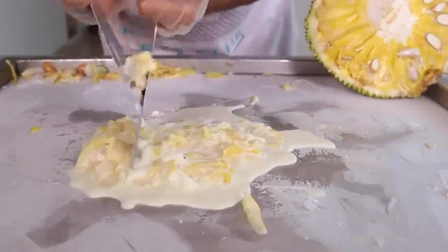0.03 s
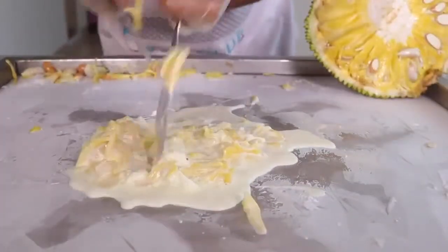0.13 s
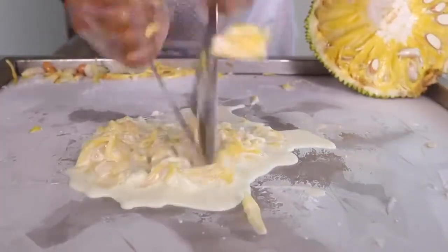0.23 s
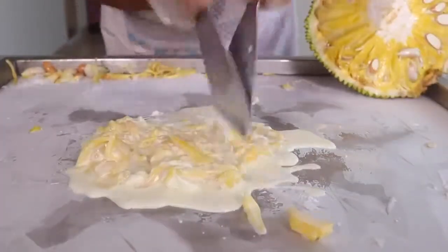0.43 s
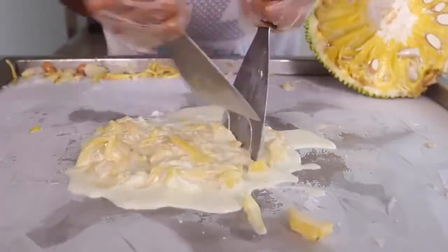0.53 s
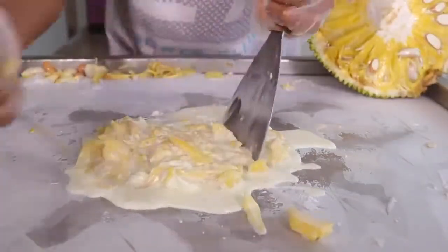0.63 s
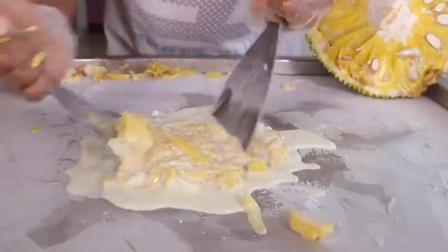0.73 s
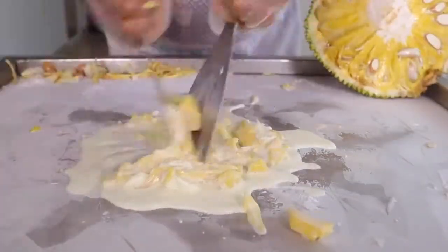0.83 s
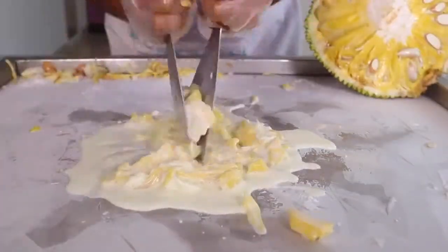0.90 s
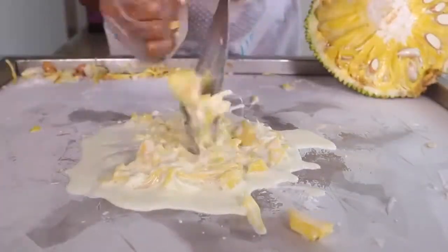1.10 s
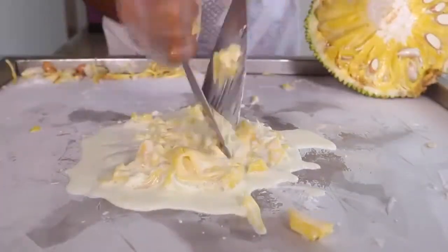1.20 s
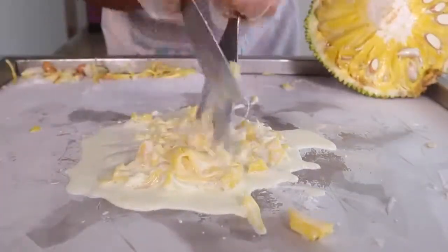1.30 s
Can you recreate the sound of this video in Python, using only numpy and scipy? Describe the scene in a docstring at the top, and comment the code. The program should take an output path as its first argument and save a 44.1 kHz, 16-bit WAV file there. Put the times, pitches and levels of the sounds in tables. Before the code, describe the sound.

Two steel scrapers chop fruit and cream on a metal plate, opening with quick taps, soft thuds and a light sliding hiss. Around 0.5 seconds the blades clink together three times, and at 0.6 two hard chops set the plate ringing. A tap follows at 0.8, then a few more taps and a dull thud between 1.1 and 1.35. A cooling machine hums faintly throughout.

```python
"""Two steel scrapers chop fruit and cream on the steel cold plate of a food stall. From the start a
cooling machine hums and the sliding blades hiss; edges tap the plate, and strokes cushioned by pulp
only thud. Around half a second in, the blades clink together three times, then two hard chops set
the whole plate ringing. As the ring dies away, a few more taps and one last thud follow."""
import sys
import numpy as np
from scipy import signal
from scipy.fft import rfft, irfft, next_fast_len
from scipy.io import wavfile
from scipy.ndimage import map_coordinates

SR = 44100
rng = np.random.default_rng(int(sys.argv[2]) if len(sys.argv) > 2 else 0)


def persist_wave(psi):
    """Save psi, clipped to +-1, as 16-bit WAV."""
    counts = np.round(np.clip(psi, -1, 1) * 32767).astype(np.int16)
    wavfile.write(sys.argv[1], SR, np.atleast_2d(counts).T)


N = 59535

# hum lines of the cooling machine (frequency [Hz], level [dB])
HUM_LINES = [(231.5, -62.5), (285.3, -57.5), (360.7, -57), (479.1, -62.5), (662.1, -70), (812.9, -64)]
# bed of fan and stall noise (frequency [Hz], level [dB])
FAN_COLOUR = [(15, -71), (25, -28), (97, -13), (145, -14.5), (175, -3.5), (256, -5.5), (293, 0.5),
              (384, -16), (416, -5.5), (818, -10.5), (1160, -14.5), (1740, -16.5), (16000, -46)]
# its stereo image (frequency [Hz], left-right likeness [0-1])
FAN_ALIKE = [(60, 0.94), (300, 0.99), (700, 0.82), (2000, 0.28), (10000, 0.13)]

# swells of the blades sliding through cream (time [s], level [dB])
SLIDE_LEVELS = [(0, -45.5), (.06, -51.5), (.125, -48.5), (.18, -53.5), (.25, -47.5), (.31, -53),
                (.37, -54.5), (.44, -46.5), (.55, -43.5), (.62, -45.5), (.8, -53), (1.06, -62.5),
                (1.22, -54), (1.35, -56.5)]
# their hiss (frequency [Hz], level [dB])
SLIDE_COLOUR = [(300, -13), (1500, -4), (2600, 3.5), (5500, 0), (7300, -5.5), (10000, 0.5), (13500, -4),
                (16000, -6)]

# light edge taps (time [s], level [dB], treble tilt [dB/octave], pan left [dB], blade clang [dB])
TAPS = [(.002, -35, 2.5, -1.5, -63.5), (.076, -36, 0.5, -1, -60), (0.0919, -42.5, 0, 0, -60),
        (0.131, -40.5, 5, -1, -59), (.144, -38.5, 0.5, 1, -55), (0.2076, -27.5, 3.5, 0, -46),
        (0.237, -39.5, 0.5, 8, -52), (0.244, -40.5, 0, -10, -44), (0.3242, -36.5, 1.5, -1.5, -27.5),
        (.4085, -27.5, 0.5, -2.5, -26.5), (0.5296, -30, 2, -1, -48), (0.8111, -30, 1, 0.5, -38),
        (1.1495, -50.5, 0, -2.5, -43.5), (1.19, -51, 2, -4, -46), (1.224, -41.5, -5, -3.5, -39),
        (1.2754, -46.5, -8, -3, -59), (1.302, -46, -1, -1, -59), (1.341, -33.5, 5.5, -1, -37.5)]
# bright tick of a tap (frequency [Hz], level [dB])
TAP_COLOUR = [(200, -14), (1100, -10.5), (2300, -1), (4500, -2), (6000, 2), (7300, -3.5), (10000, -0.5),
              (11500, -4.5), (13300, 2), (16000, -9.5)]
# clang of a damped blade (frequency [Hz], level [dB])
CLANG_COLOUR = [(1500, -40), (3000, -23), (3500, 0.5), (4400, 0.5), (5000, -1), (5600, -9.5), (7500, -14),
                (9600, -25), (10100, 0), (10700, -16), (16000, -12)]

# strokes cushioned by pulp (time [s], thud [dB], knock [dB], low plate ring [dB])
THUDS = [(.003, -49, -47, -44.5), (0.124, -44.5, -51, -67), (.236, -38.5, -56, -64),
         (0.343, -38.5, -43.5, -49), (.469, -44, -52, -69), (0.52, -41, -59, -63),
         (1.239, -39.5, -40.5, -39)]
# soft boom of a thud (frequency [Hz], level [dB])
THUD_COLOUR = [(25, -33), (60, -11), (110, -13), (175, 5.5), (230, 0.5), (300, -3.5), (400, -5.5),
               (490, -2), (620, -15), (850, -32), (1300, -22), (5000, -49)]
# hollow knock of the sheet (frequency [Hz], level [dB])
KNOCK_COLOUR = [(60, -32), (130, -13), (220, 0.5), (350, -9), (490, -12), (600, 0), (780, 2.5), (900, 2.5),
                (1100, -8), (1500, 2.5), (2200, -29), (3400, -9.5), (4600, -3), (5600, -35)]
# stereo image of knocks and thuds (frequency [Hz], left-right likeness [0-1])
KNOCK_ALIKE = [(200, 0.99), (800, 0.88), (2000, 0.38)]
# the plate's clearest modes (frequency [Hz], level [dB], t60 [s])
PLATE_MODES = [(182.1, -15, .6), (483, -0.5, .38), (735, -8, .22), (768, -13.5, .4), (808, -14, 0.59),
               (862, -11, 0.31), (900.6, -8, 0.22), (1466, -11, 0.308), (1832, -6, .26), (2013, -10, 0.48),
               (1950, -1.5, 0.28), (2149, 2, 0.275), (2484, -8.5, 0.38), (3430, -11, .28), (4134, -6, 0.2)]

# blade meets blade (time [s], ring [dB], rasp [dB], lead-in rub [s])
CLINKS = [(.459, -26, -23.5, 0.0045), (0.5123, -33, -26.5, 0.0028), (0.588, -35, -24.5, 0.00098)]
# modes of a freely ringing blade (frequency [Hz], level [dB], t60 [s])
BLADE_MODES = [(3047, -12.5, .22), (5896, 0, 0.1), (5850, -7, 0.023), (9200, -13, .04), (12500, -10, 0.039),
               (13400, 3.5, 0.041), (13370, 1, 0.098), (15300, -4, 0.086)]
# rasp of steel on steel (frequency [Hz], level [dB])
RASP_COLOUR = [(500, -31), (2000, -10.5), (3500, -0.5), (5800, -9), (7000, -9), (9000, -1), (11000, 1),
               (13300, 8.5), (16000, -5)]

# hard chops (time [s], crack [dB], treble tilt [dB/octave], bite [dB], blade clang [dB],
# knock [dB], wash [dB], low plate ring [dB], high plate ring [dB])
CHOPS = [(0.6031, -16.5, 1.5, -17.5, -25.5, -32.5, -29, -37, -30.5),
         (0.6336, -23, 2, -19, -25, -21, -32.5, -32, -39.5)]
# crack of a chop (frequency [Hz], level [dB])
CRACK_COLOUR = [(150, -21), (500, -16), (820, -4), (1200, -17), (1750, 2), (2150, 4.5), (2900, -14.5),
                (3900, -4.5), (5200, -15.5), (8000, -17.5), (16000, -31)]
# its stereo image (frequency [Hz], left-right likeness [0-1])
CRACK_ALIKE = [(200, .97), (850, 0.94), (1500, .65), (2200, .1), (4000, 0.17)]
# the edge biting the steel (frequency [Hz], level [dB])
BITE_COLOUR = [(500, -11), (2000, -3), (4500, 0), (7500, -1), (13500, 0), (16000, -4)]
# wash of the plate's dense modes (frequency [Hz], level [dB])
WASH_COLOUR = [(60, -14.5), (200, -3.5), (350, -0.5), (850, -3.5), (1200, -10), (2000, 2), (2900, -5.5),
               (4000, -3.5), (5200, -11), (8000, -9), (16000, -12)]
# its decay (frequency [Hz], t60 [s])
WASH_T60 = [(200, 0.7), (900, 1), (2000, 0.85), (4500, 0.63), (14000, 0.28)]
# its stereo image (frequency [Hz], left-right likeness [0-1])
WASH_ALIKE = [(200, .97), (500, .88), (1000, 0.63), (2000, 0.12), (10000, 0.089)]

EDGE_ALIKE = 0.47  # left-right likeness of ticks, clangs, rasps and bites
GRIND_S, GRIND_DB = 0.0034, -13.5  # the edge cuts through fruit just before a chop lands
TAP_SEND_DB, CLINK_SEND_DB, ROOM_T60 = -7.5, -16, 0.49
LOW_MODES_HZ, TOP_HZ = 900, 15900


def amp(db):
    """Decibels to gain."""
    return 10 ** (np.asarray(db) / 20)


def unit(x):
    """Scale to rms 1."""
    return x / np.sqrt(np.mean(x ** 2) + 1e-20)


def along(points, hz):
    """Read (frequency [Hz], value) points on a log axis."""
    freqs, values = np.transpose(points)
    return np.interp(np.log(hz + 1), np.log(freqs + 1), values)


def since(s):
    """Seconds since time s, negative before it."""
    return np.arange(N) / SR - s


def wobble(rate):
    """A smooth random curve, rate knots a second."""
    return map_coordinates(rng.standard_normal(2048), [since(0) * rate + 2], mode="mirror")


def noise(colour, alike, tilt_db=0):
    """Coloured stereo noise of rms 1; alike is a likeness or a table, tilt is per octave above 1 kHz."""
    size = 2 * next_fast_len(N // 2 + 1)
    hz = np.fft.rfftfreq(size, 1 / SR)
    likeness = along(alike, hz) if np.ndim(alike) else alike
    width = np.arccos(np.clip(likeness, -1, 1)) / 2
    octaves = np.log2(np.maximum(hz, 1000) / 1000)
    gain = amp(along(colour, hz) + tilt_db * octaves) * (hz < TOP_HZ)
    spectra = rfft(rng.standard_normal((2, size))) * gain
    mid, side = spectra[0] * np.cos(width), spectra[1] * np.sin(width)
    return unit(irfft(np.array([mid + side, mid - side]))[:, :N])


def fade(s, t60, hold=0, rise=0.00024):
    """Envelope that rises at s, holds, then falls 60 dB in t60; all in seconds."""
    t = np.maximum(since(s), 0)
    return (1 - np.exp(-t / rise)) * np.exp(-np.log(1000) * np.maximum(t - hold, 0) / t60)


def ring(s, modes, spread, waver):
    """Modes struck at s; phases waver and spread left to right [rad], narrowing in the bass."""
    out = np.zeros((2, N))
    for hz, db, t60 in modes:
        gap = spread * min(hz / 2000, 1) ** 2 * rng.choice([-1, 1]) * np.array([[.5], [-.5]])
        phase = rng.uniform(0, 2 * np.pi) + gap + waver * wobble(rate=12 / t60)
        out += amp(db + rng.normal(0, 1)) * fade(s, t60) * np.sin(2 * np.pi * hz * since(s) + phase)
    return out


def panned(x, db):
    """Make the left channel db louder than the right."""
    return x * amp(np.array([[.5], [-.5]]) * db)


def machine():
    """The cooling machine: slightly unsteady hum lines over a bed of fan noise."""
    hum = np.zeros(N)
    for hz, db in HUM_LINES:
        drift = 0.93 * wobble(rate=10.1)  # radians
        hum += amp(db) * unit(np.sin(2 * np.pi * hz * since(0) + drift))
    return amp(-0.5) * hum + amp(-47.5) * noise(FAN_COLOUR, FAN_ALIKE)


def slide():
    """Grainy hiss of steel sliding over the wet plate."""
    level_db = np.interp(since(0), *np.transpose(SLIDE_LEVELS))
    grain = unit(amp(2 * wobble(rate=400)))
    return amp(level_db) * grain * noise(SLIDE_COLOUR, alike=0.18)


def snap(s):
    """Envelope of the first hard contact: a spike on top of a tap or clink."""
    return amp(-0.5) * fade(s, t60=0.0022, rise=.00005)


def taps():
    """An edge chatters on the plate for a moment; the damped blade clangs briefly."""
    out = np.zeros((2, N))
    for s, db, tilt_db, pan_db, clang_db in TAPS:
        clang = amp(clang_db) * (snap(s) + fade(s, t60=0.023)) * noise(CLANG_COLOUR, EDGE_ALIKE)
        chatter = fade(s, t60=.01, hold=.0026)
        tail = amp(-14) * fade(s, t60=.06)
        tick = amp(db) * (snap(s) + chatter + tail) * noise(TAP_COLOUR, EDGE_ALIKE, tilt_db)
        out += panned(tick + clang, pan_db)
    return out


def thuds():
    """Through soft pulp a stroke wakes only the plate's low resonances."""
    out = np.zeros((2, N))
    for s, db, knock_db, ring_db in THUDS:
        out += amp(db) * fade(s, t60=0.61, rise=0.0036) * noise(THUD_COLOUR, KNOCK_ALIKE)
        out += knock(s, knock_db, tilt_db=-15)  # pulp dulls the treble
        out += plate(s, ring_db, low=True)
    return out


def knock(s, db, tilt_db=0):
    """The struck sheet gives a short, hollow knock."""
    return amp(db) * fade(s, t60=.08, rise=.0012) * noise(KNOCK_COLOUR, KNOCK_ALIKE, tilt_db)


def plate(s, db, low):
    """The struck sheet rings in its low modes or its high ones."""
    modes = [mode for mode in PLATE_MODES if (mode[0] < LOW_MODES_HZ) == low]
    return amp(db) * ring(s, modes, spread=1.2, waver=.25)


def room(send):
    """The stall's diffuse reverb, different on each side."""
    tail = rng.standard_normal((2, N)) * fade(0.0014, ROOM_T60, rise=0.001)
    return signal.fftconvolve(send, tail / np.linalg.norm(tail[0]), axes=1)[:, :N]


def clinks():
    """One blade rubs along the other, slips off and rings."""
    out = np.zeros((2, N))
    for s, ring_db, rasp_db, rub_s in CLINKS:
        rub = amp(-4.5) * fade(s - rub_s, t60=0.065, hold=rub_s, rise=0.00052)
        slip = fade(s, t60=0.065)
        out += amp(rasp_db) * (snap(s) + np.maximum(rub, slip)) * noise(RASP_COLOUR, EDGE_ALIKE)
        out += amp(ring_db) * ring(s, BLADE_MODES, spread=1.0, waver=.55)
    return panned(out, db=-2)


def chops():
    """A hard blow grinds through fruit, bites the steel, knocks the sheet and leaves it ringing."""
    out = np.zeros((2, N))
    for s, crack_db, tilt_db, bite_db, clang_db, knock_db, wash_db, low_db, high_db in CHOPS:
        grind = amp(GRIND_DB) * fade(s - GRIND_S, t60=.006, hold=GRIND_S, rise=0.00093)
        contact = fade(s, t60=.006, rise=.00005)
        impact = fade(s, t60=.036, hold=.0022)
        crack = amp(crack_db) * impact * noise(CRACK_COLOUR, CRACK_ALIKE, tilt_db)
        bite = amp(bite_db) * (grind + contact) * noise(BITE_COLOUR, EDGE_ALIKE)
        out += panned(crack + bite, db=-3.0) + knock(s, knock_db)
        out += amp(clang_db) * impact * noise(CLANG_COLOUR, EDGE_ALIKE)
        out += amp(wash_db) * wash(s) + plate(s, low_db, low=True) + plate(s, high_db, low=False)
    return out


def wash(s):
    """The plate's dense modes blur into a shimmer, each band dying at its own speed."""
    hz, t, bands = signal.stft(noise(WASH_COLOUR, WASH_ALIKE), SR, nperseg=256)
    decay = np.exp(-np.log(1000) * np.maximum(t - s, 0) / along(WASH_T60, hz)[:, None])
    return signal.istft(bands * decay, SR)[1][:, :N] * (since(s) > 0)


def scene():
    """Scrapers and plate over the machine; only taps and clinks feed the reverb."""
    tapping, clinking = taps(), clinks()
    reverb = room(amp(TAP_SEND_DB) * tapping + amp(CLINK_SEND_DB) * clinking)
    return tapping + clinking + reverb + chops() + thuds() + slide() + machine()


def record(dry):
    """A brick-wall low-pass on the whole mix."""
    size = next_fast_len(N + SR // 2)
    passband = np.fft.rfftfreq(size, 1 / SR) < TOP_HZ
    return irfft(rfft(dry, size) * passband, size)[:, :N]


dry = scene()
out = record(dry)
persist_wave(out)
```